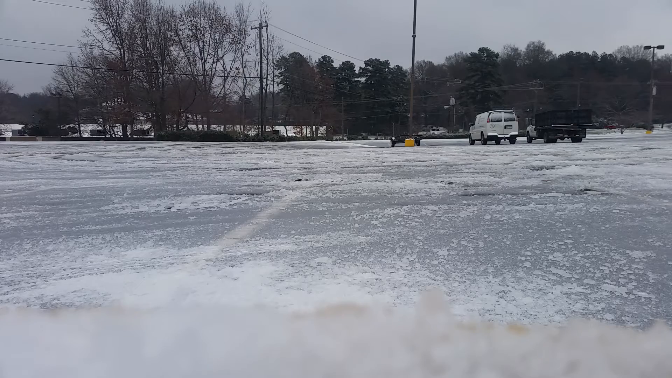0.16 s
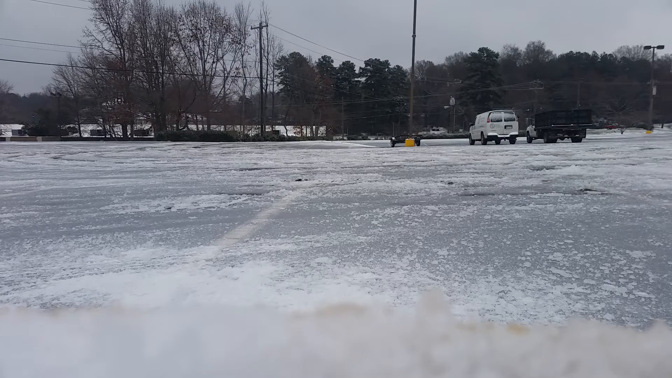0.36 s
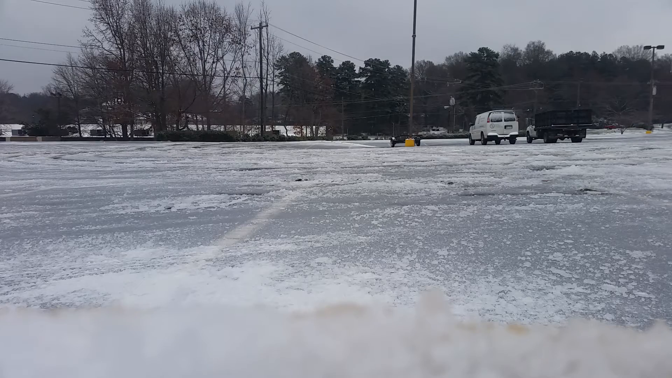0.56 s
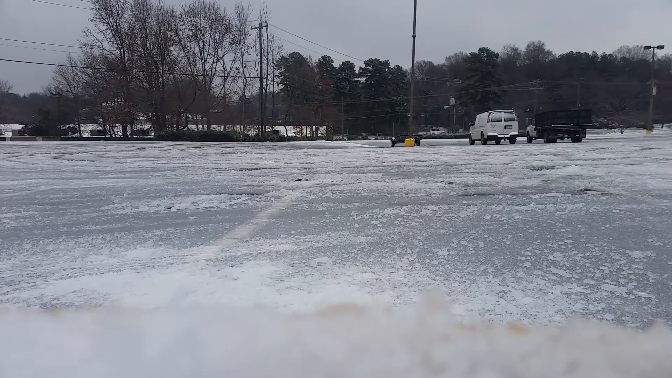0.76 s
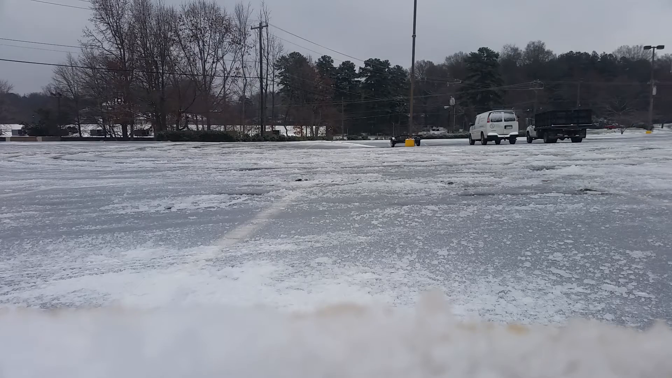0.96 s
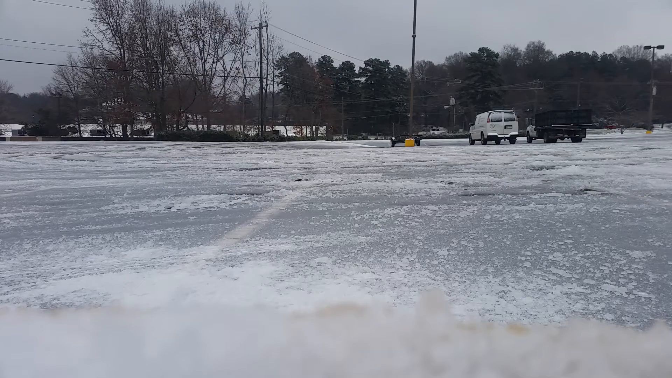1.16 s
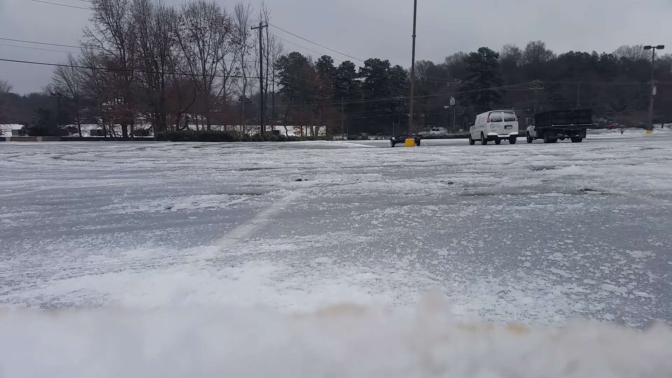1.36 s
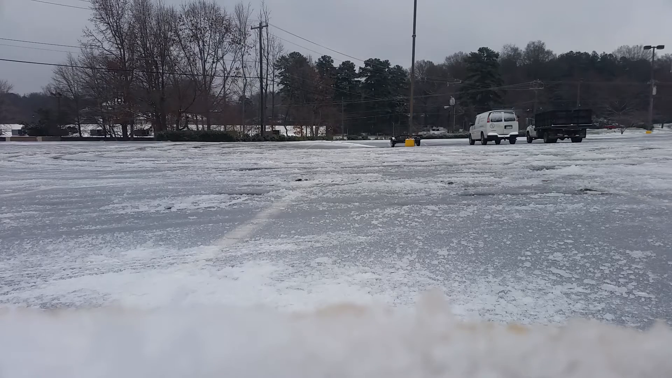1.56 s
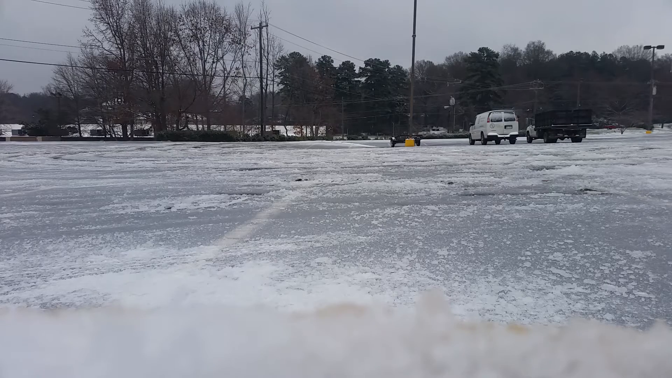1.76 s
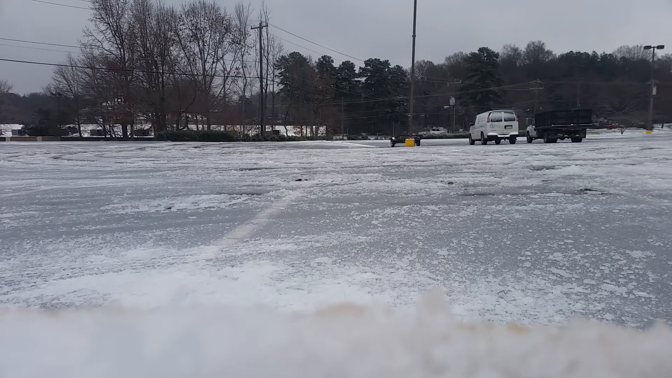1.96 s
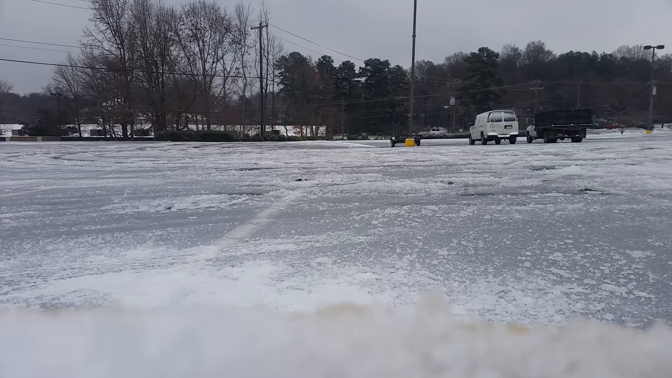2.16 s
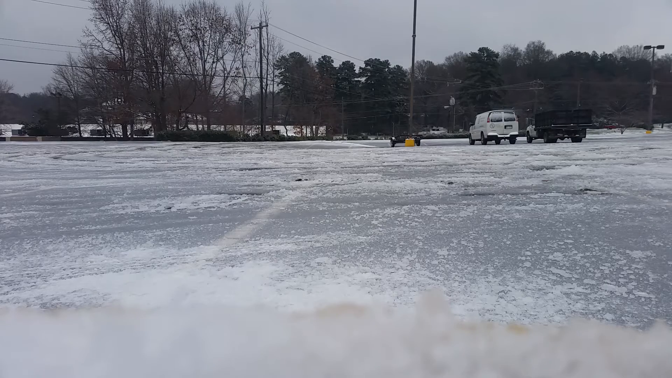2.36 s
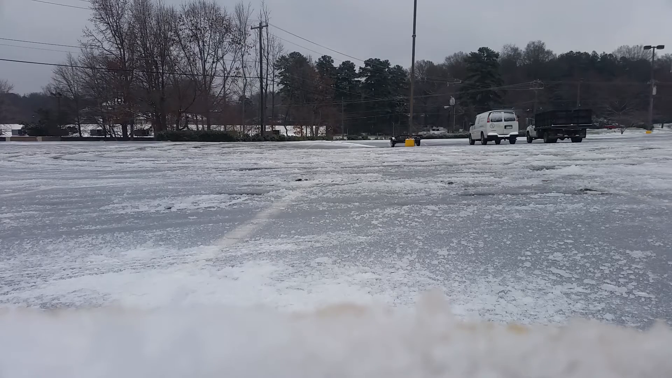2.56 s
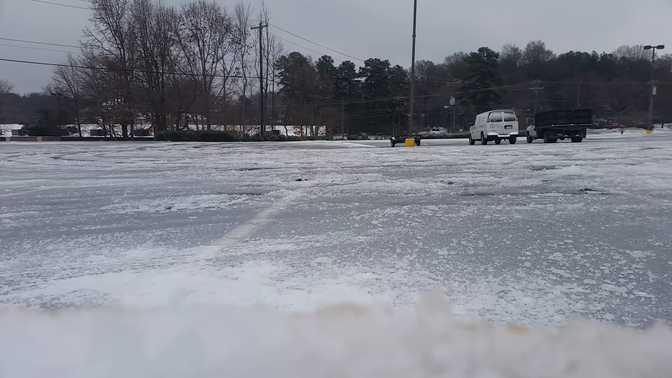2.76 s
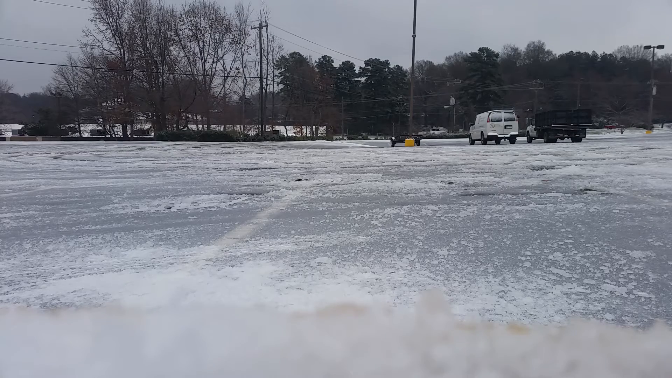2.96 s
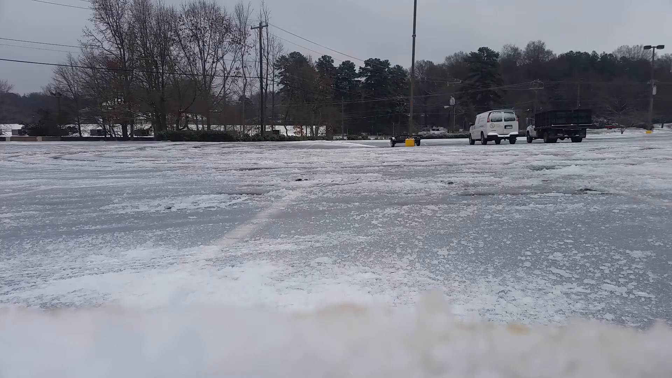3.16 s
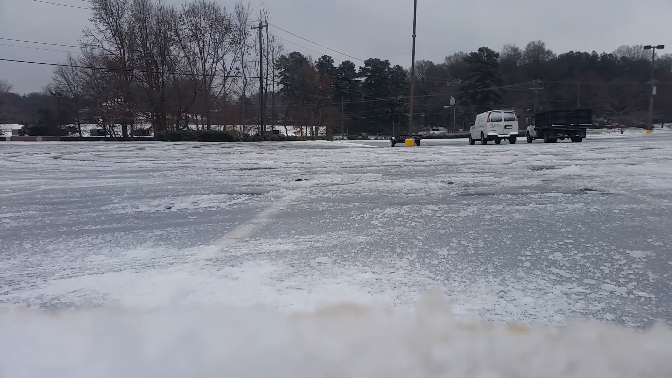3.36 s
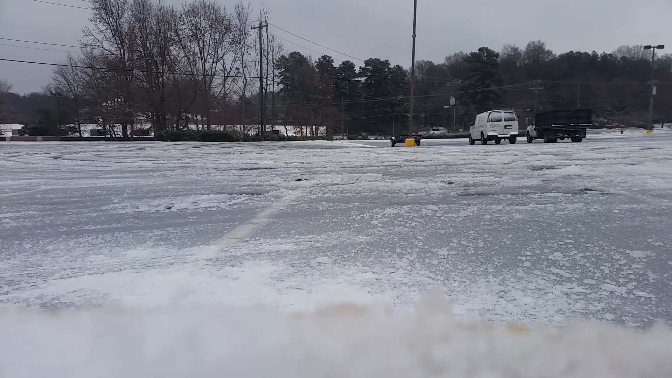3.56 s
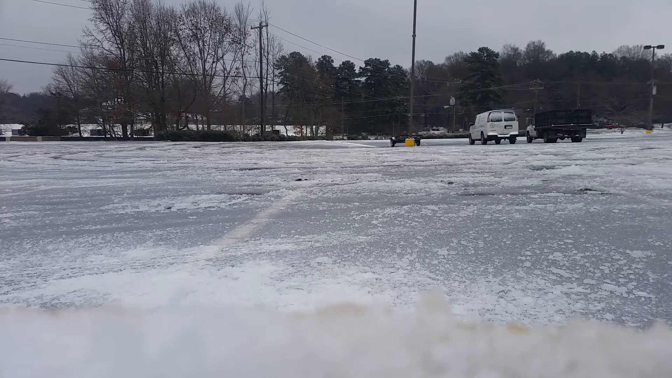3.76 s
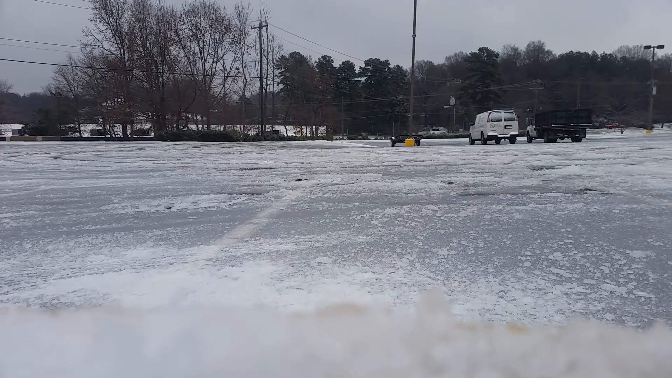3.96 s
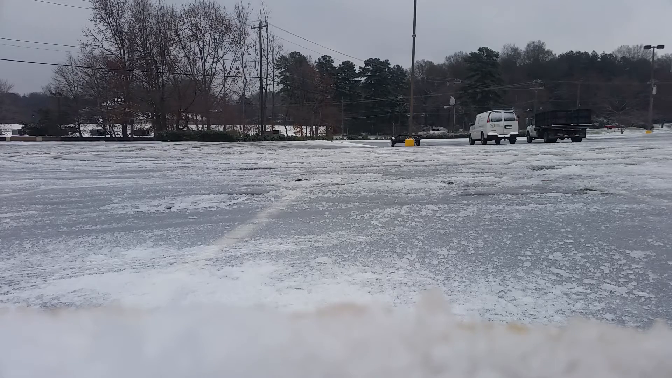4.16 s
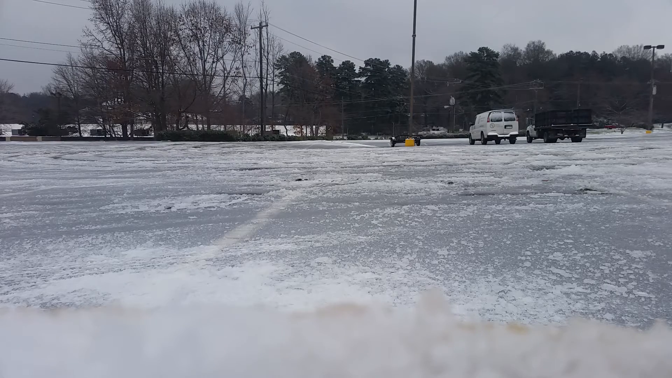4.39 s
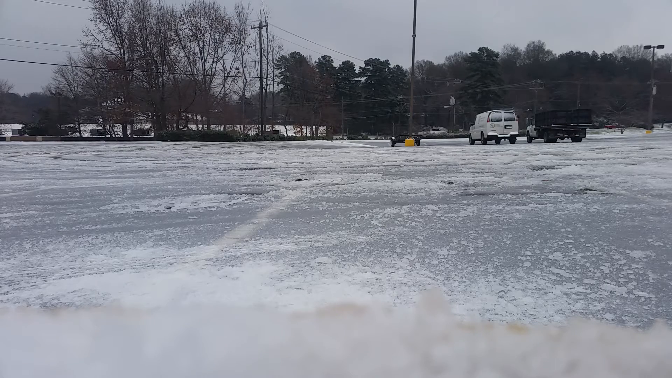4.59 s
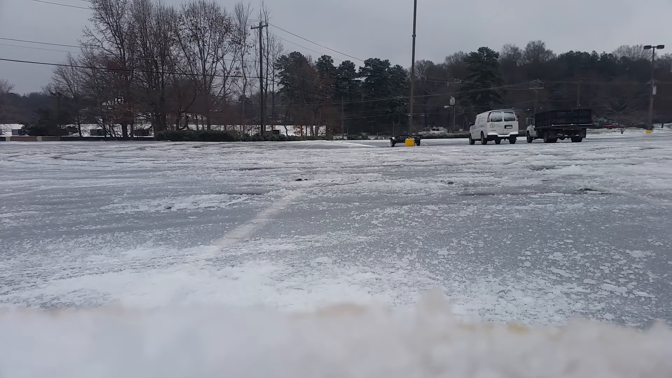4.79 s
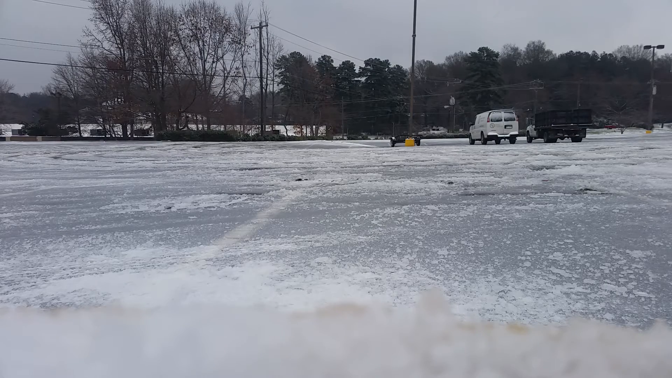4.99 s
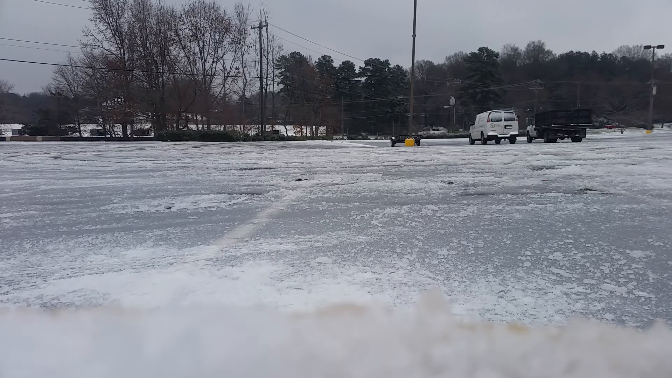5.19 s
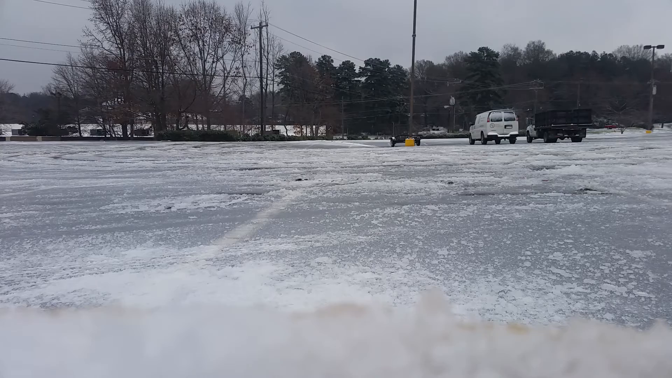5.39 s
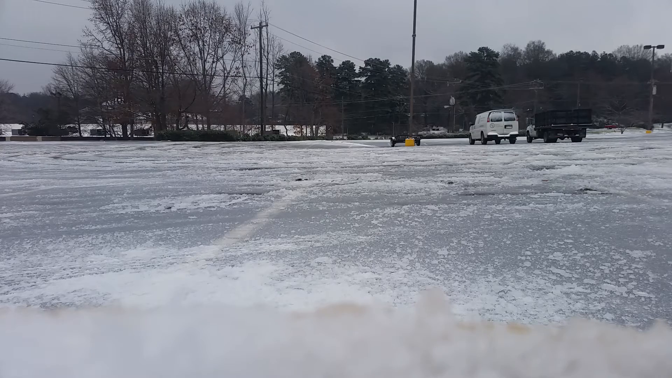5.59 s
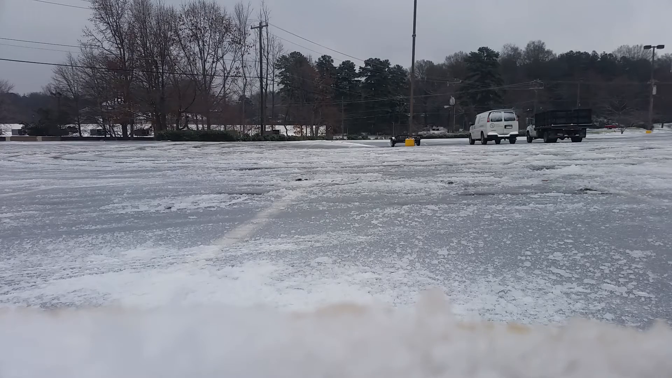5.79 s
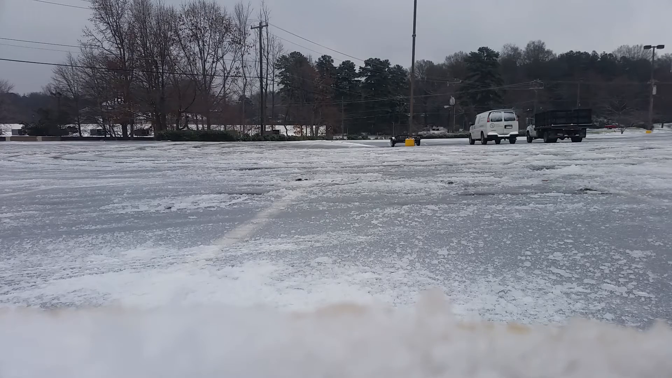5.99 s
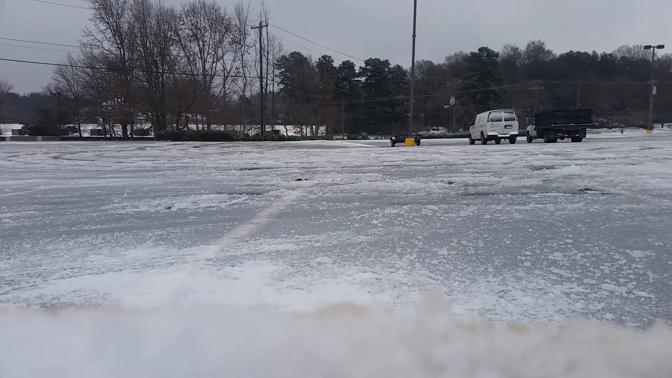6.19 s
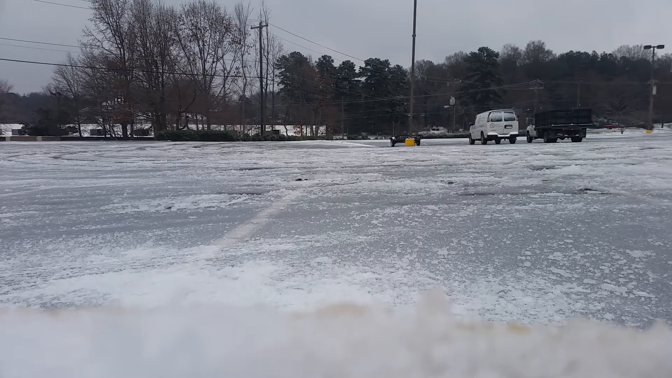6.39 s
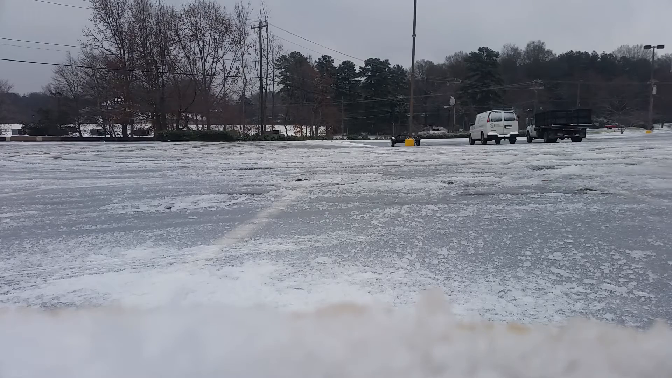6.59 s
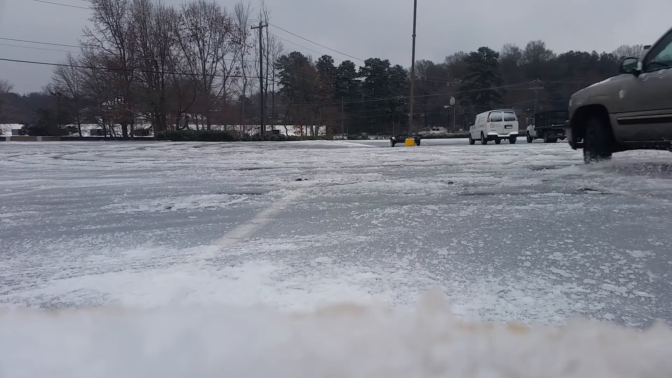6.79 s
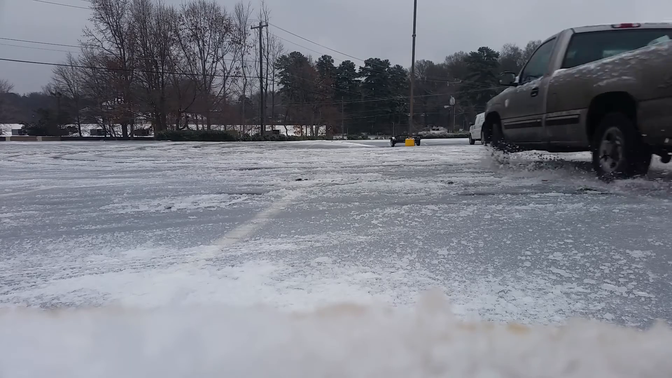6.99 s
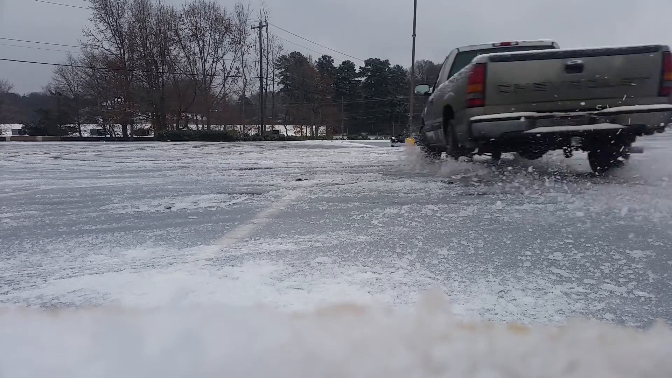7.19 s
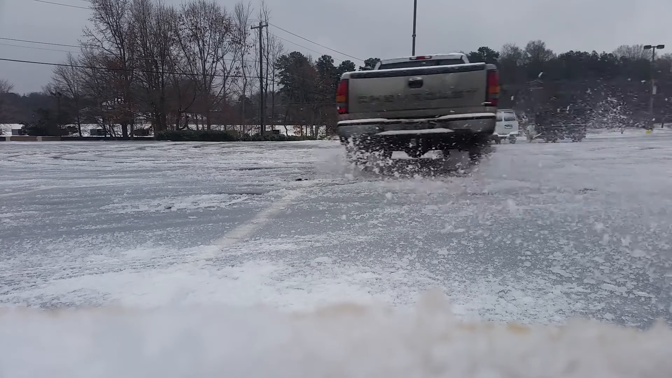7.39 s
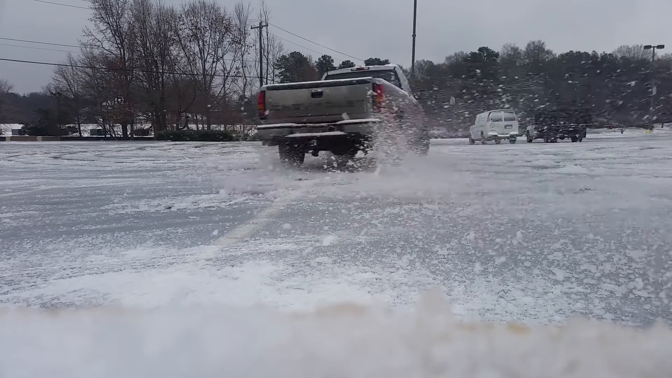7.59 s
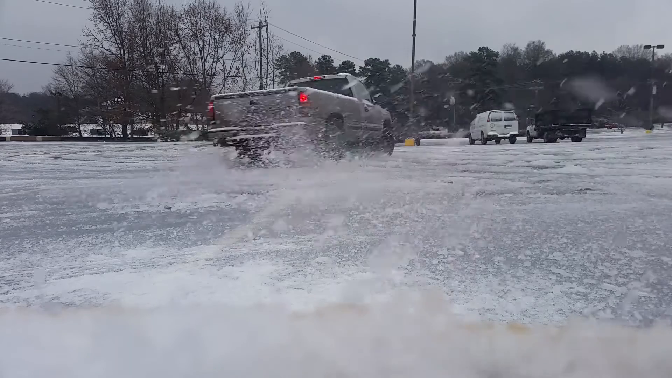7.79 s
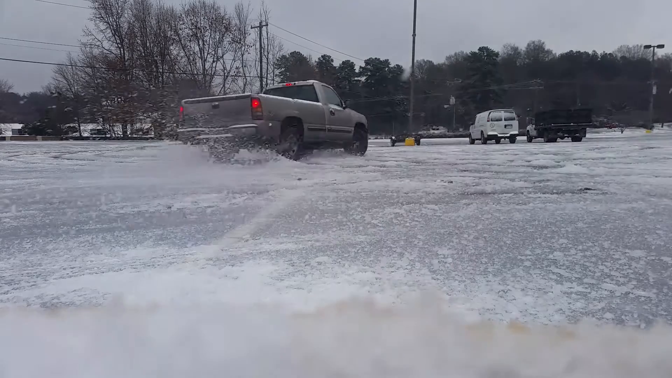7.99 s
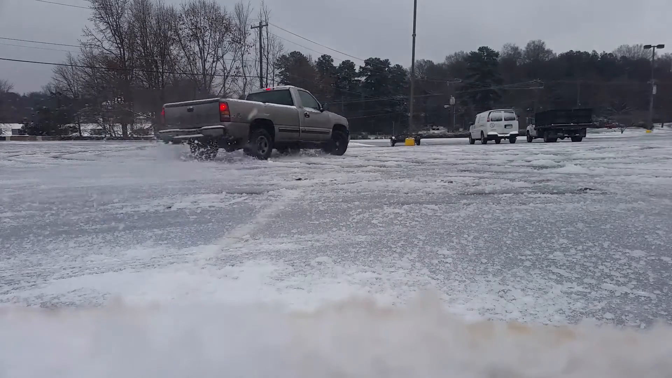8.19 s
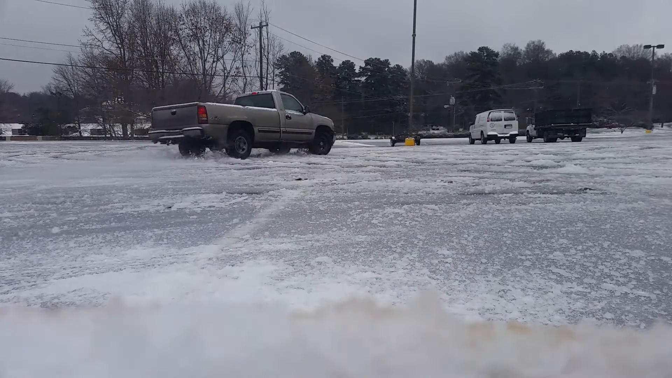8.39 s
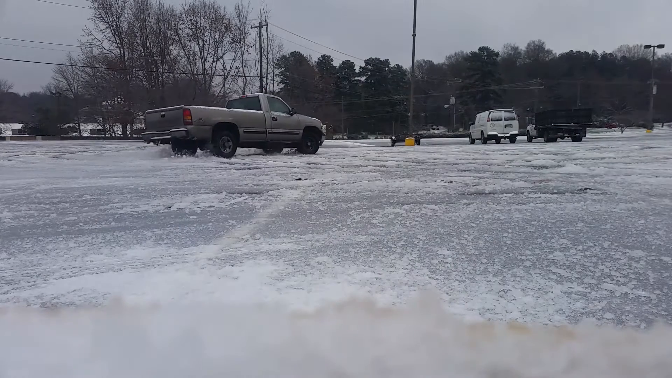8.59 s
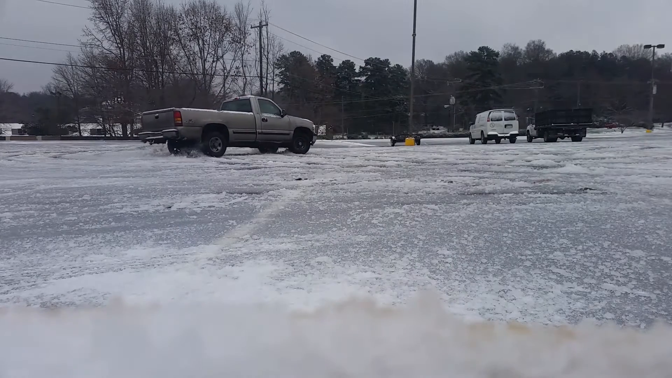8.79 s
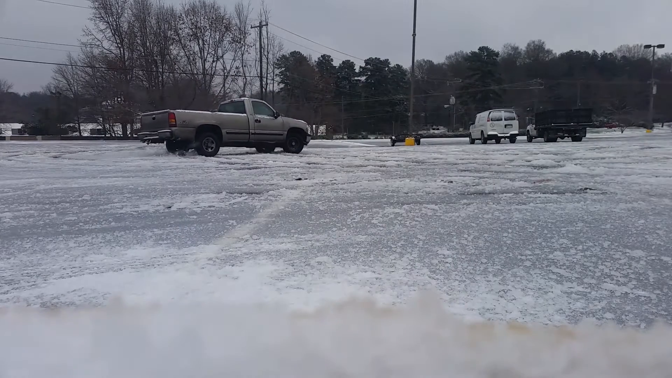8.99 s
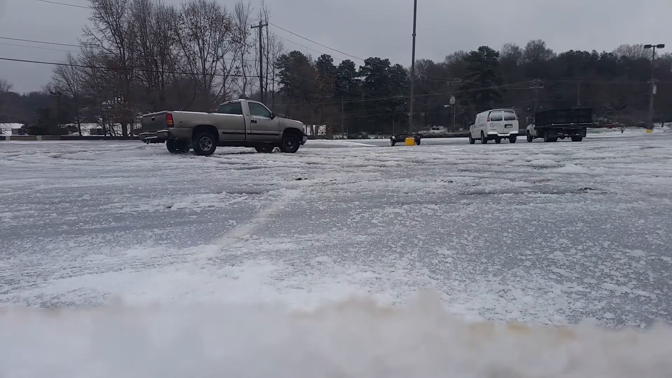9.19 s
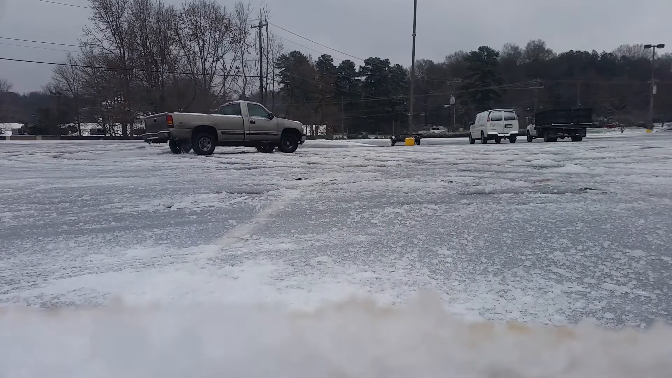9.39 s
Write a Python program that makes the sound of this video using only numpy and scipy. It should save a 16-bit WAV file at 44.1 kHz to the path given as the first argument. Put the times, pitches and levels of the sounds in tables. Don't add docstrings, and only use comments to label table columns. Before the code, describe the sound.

Outdoors on an icy open lot, a low stereo microphone hears a pickup circling off to the right, engine droning in short pushes over crunching crust. It charges closer, revs climbing, slides past with cracking ice and hissing spray. Ice bits tick and thud against the microphone body, the truck fades quickly, and a hard wind gust buffets at the end.

```python
import sys
import numpy as np
from scipy import signal
from scipy.fft import rfft, irfft, next_fast_len
from scipy.io import wavfile
from scipy.ndimage import map_coordinates

SR = 44100
rng = np.random.default_rng(int(sys.argv[2]) if len(sys.argv) > 2 else 0)


def master(y):
    cut = np.clip(np.atleast_2d(y).T, -1, 1)
    pcm = np.round(cut * 32767)
    wavfile.write(sys.argv[1], SR, pcm.astype(np.int16))


def voltage_ratio(decibels):
    exponent = np.asarray(decibels, float) / 20
    return 10 ** exponent


N = 416744

# t/s, rolling level/dB, wheelspin level/dB
PROGRESS = [(0, -31, -59), (1.14, -28.5, -55), (1.91, -32, -54.5), (2.3, -31.5, -51.5), (2.42, -37, -54),
            (3.2, -35.5, -57.5), (3.87, -35.5, -57), (4.5, -32.5, -54), (5.08, -28, -50.5),
            (5.48, -23.5, -44), (6.07, -20.5, -36.5), (6.99, -21.5, -33), (7.16, -20, -35.5),
            (7.9, -25.5, -41.5), (7.97, -37, -49.5), (8.25, -39, -56.5), (8.63, -42.5, -64.5),
            (9.45, -44, -63.5)]


def unit(x):
    return x / np.sqrt(np.mean(np.abs(x) ** 2) + 1e-20)


def along(points, hz):
    f, v = np.transpose(points)
    return np.interp(np.log(hz + 1), np.log(f + 1), v)


def curves(rows, t=None):
    s, *cols = np.transpose(rows)
    moments = np.arange(N) / SR if t is None else t
    return [np.interp(moments, s, c) for c in cols]


def wobble(rate):
    knots = rng.standard_normal(int(N * rate / SR) + 4)
    return map_coordinates(knots, [np.arange(N) * rate / SR])


def swell(s, db, length):
    return db * np.exp(-((np.arange(N) / SR - s) / length) ** 2)


def filtered(x, response):
    m = next_fast_len(N + SR // 2)
    return irfft(rfft(x, m) * response(np.fft.rfftfreq(m, 1 / SR)), m)[..., :N]


def resonance(f, hz, width_hz):
    return 1j * f * width_hz / (hz * hz - f * f + 1j * f * width_hz + 1e-9)


def upper(f, hz):
    return 1 / (1 + (hz / (f + 1)) ** 8)


def coloured(points, share):
    noise = rng.standard_normal((2, N))
    return unit(filtered(noise, lambda f: voltage_ratio(along(points, f)) * share(f)))


def crust(clumps_db):
    # f/Hz, density/dB per Hz
    crush = [(24, -49.5), (40, -13), (81, -5.5), (193, -2.5), (242, -4.5), (297, -6.5), (433, -5.5),
             (653, -5.5), (859, -6.5), (1510, -10.5), (2400, -27.5), (3120, -37.5), (5280, -120)]
    # t/s, swell/dB, length/s
    ruts = [(0.152, -6.5, 0.021), (0.216, 6.5, 0.053), (0.504, -4, 0.021), (0.8, -2.5, 0.0097),
            (1.413, -2.5, 0.013), (1.72, -2, 0.011), (7.23, -0.5, 0.09), (1.18, 1, 0.14),
            (3.37, 2.5, 0.073), (3.63, 2, 0.074), (4.078, 3, 0.11), (4.42, 4.5, 0.052), (6.635, 1, 0.098),
            (7.662, 1.5, 0.045), (7.826, 5, 0.015), (7.857, -8, 0.028), (7.894, 5.5, 0.014),
            (8.058, 6, 0.078)]
    # t/s, swell/dB, length/s
    squeaks = [
        (13, 4.5, 0.0092),
        (7.51, 7, 0.012),
        (7.62, 3, 0.037),
    ]
    edge_under_crush_db, muffled_db, turned_s = -3, -12, 1.46
    rolling_db, _ = curves(PROGRESS)
    crush_db = rolling_db + sum(swell(*rut) for rut in ruts)
    edge_db = crush_db + sum(swell(*squeak) for squeak in squeaks) + edge_under_crush_db
    edge_db = edge_db + muffled_db * np.clip(1 - np.arange(N) / SR / turned_s, 0, 1)
    body = voltage_ratio(crush_db + 3.5) * coloured(crush, lambda f: 1 - upper(f, 1164))
    edge = voltage_ratio(edge_db + 3.0 + 0.61 * wobble(16)) * coloured(crush, lambda f: upper(f, 825))
    return voltage_ratio(clumps_db + 1.0 * wobble(250)) * (body + edge)


def spray(clumps_db):
    # f/Hz, density/dB per Hz
    near_spray = [(1120, -20.5), (1900, -8.5), (2620, -3.5), (3210, -2), (4380, -7.5), (5420, -18.5),
                  (7000, -16.5), (8000, -24.5), (8840, -31.5), (10000, -36.5), (12300, -28), (15100, -23),
                  (15900, -29.5)]
    # f/Hz, density/dB per Hz
    far_spray = [(1120, -18.5), (1900, -8), (2310, -10), (2990, -11.5), (3420, -11.5), (4460, -13),
                 (5570, -22), (6830, -56.5), (8310, -60), (10500, -52), (12800, -33.5), (15100, -26.5),
                 (15900, -27)]
    # t/s, share of near spray (0-1), fine mist under the spray/dB
    nearness = [(0, 0.24, -13.5), (2.4, 0.18, -21.5), (4.3, 0.11, -12), (5, 0.24, -7.5), (5.5, 0.47, -12),
                (7.9, 0.95, -6), (8.3, 0.07, -1), (9.45, 0.089, -3)]
    # t/s, swell/dB, length/s
    spray_swells = [
        (5.3, 0, 0.11),
        (6.546, 4.5, 0.0076),
        (6.65, -2, 0.15),
        (6.946, 1.5, 0.1),
        (7.152, 1.5, .06),
    ]
    # t/s, level/dB
    drift = [
        (8.85, 0.5),
        (9.1, 9.5),
        (9.21, 11.5),
        (9.24, -2),
        (9.33, -0.5),
    ]
    drift_coarse = 0.6
    air_db = -75.5
    _, spin_db = curves(PROGRESS)
    near, mist_db = curves(nearness)
    near = np.clip(near, 0, 1)
    drift_db = curves(drift)[0]
    coarse_db = spin_db + sum(swell(*spray_swell) for spray_swell in spray_swells) + drift_coarse * drift_db
    fine_db = 10 * np.log10(voltage_ratio(spin_db + mist_db + drift_db) ** 2 + voltage_ratio(air_db) ** 2)

    def at_distance(share):
        return np.sqrt(near) * coloured(near_spray, share) + np.sqrt(1 - near) * coloured(far_spray, share)

    coarse = voltage_ratio(coarse_db + 6.5) * at_distance(lambda f: 1 - upper(f, 8400))
    fine = voltage_ratio(fine_db + 4.5 + 0.89 * wobble(18)) * at_distance(lambda f: upper(f, 10200))
    return voltage_ratio(0.35 * clumps_db + 0.84 * wobble(14) + 1.0 * wobble(550)) * (coarse + fine)


def tyres():
    clumps_db = 0.65 * wobble(12) + 1.07 * wobble(45)
    return crust(clumps_db) + spray(clumps_db)


def wind():
    # t/s, buffet level/dB, left-right/dB
    breeze = [(0, -25, -10), (.27, -27, 11), (.62, -31, 8), (1, -27.5, 9.5), (1.4, -34, 8),
              (1.78, -28, 14.5), (2.05, -30, 2), (2.6, -34, 5.5), (3.72, -39, 4), (4.26, -33.5, 8.5),
              (4.83, -35, 6), (5.87, -48, 12.5), (7.76, -28.5, -6.5), (8.1, -35, 10), (8.6, -53.5, 19),
              (8.88, -39, 1), (8.95, -23.5, -9.5), (9.28, -21, -3)]
    # t/s, peak level/dB, length/s
    gust = [
        [(8.955, -10, 0.013), (8.985, -7, 0.01), (9.005, -20, 0.0072), (9.085, -4.5, 0.018),
         (9.105, -10, 0.015), (9.15, -7, 0.0092), (9.175, -6, 0.027), (9.192, 4, 0.0047), (9.215, -9, 0.0065),
         (9.23, -13, 0.018)],
        [(8.952, -9, 0.0084), (8.968, -9, 0.0081), (9.01, -11, 0.017), (9.05, -7.5, 0.0071),
         (9.15, -9.5, 0.018), (9.24, 2.5, 0.0078), (9.262, -3.5, 0.0058), (9.272, -5, .006), (9.298, -12, .006),
         (9.287, -3, 0.0064), (9.32, -29, 0.028)],
    ]
    # f/Hz, density/dB per Hz
    buffet = [(12, -43.5), (20, -14), (64, -2), (108, -1.5), (256, -13.5), (381, -19.5), (447, -22.5),
              (900, -33.5), (1170, -55), (1980, -120)]
    lull_db_per_s = -80
    snap_10ms_db, snap_db_per_doubling = -22.5, -5
    t = np.arange(N) / SR
    level_db, pan_db = curves(breeze)
    level_db = level_db + lull_db_per_s * np.clip(t - breeze[-1][0], 0, None)
    slow_lumps, quick_lumps = np.array([wobble(16), wobble(18)]), np.array([wobble(55), wobble(55)])
    lumps = voltage_ratio(2.7 * slow_lumps + 1.8 * quick_lumps)
    noise = rng.standard_normal((2, 2, N))
    eddies = unit(filtered(noise[0], lambda f: voltage_ratio(along(buffet, f))))
    snaps = unit(filtered(noise[1], lambda f: resonance(f, 350, 350) ** 2))
    rumble = unit(lumps * filtered(eddies, lambda f: resonance(f, 85, 150)))
    out = voltage_ratio(level_db + 1.5 + np.outer([0.5, -0.5], pan_db)) * rumble
    for port, rows in enumerate(gust):
        for s, db, length in rows:
            snap_db = snap_10ms_db + snap_db_per_doubling * np.log2(100 * length)
            span = slice(round((s - 0.1) * SR), round((s + 0.1) * SR))
            push = eddies[port, span] * np.exp(-((t[span] - s) / length) ** 2)
            snap = snaps[port, span] * np.exp(-((t[span] - s) / (0.5 * length)) ** 2)
            out[port, span] += voltage_ratio(db) * (push / np.abs(push).max() + voltage_ratio(snap_db) * snap)
    return out


def cracks():
    # t/s, peak level/dB, slab f/Hz
    breaks = [(0.025, -21, 442), (0.183, -23.5, 473), (0.229, -25.5, 441), (0.385, -23.5, 574),
              (0.441, -30, 468), (0.652, -18.5, 584), (0.812, -22.5, 589), (0.853, -15.5, 463),
              (1.121, -20, 675), (1.359, -22, 476), (1.46, -23, 1550), (1.609, -14.5, 630),
              (1.685, -19.5, 584), (1.742, -21.5, 504), (1.866, -12.5, 530), (2.328, -27, 454),
              (2.824, -26, 1286), (2.869, -22.5, 1340), (3.26, -20.5, 424), (3.418, -21, 432),
              (3.554, -19.5, 559), (3.892, -30, 1446), (3.924, -21.5, 580), (4.041, -22, 525),
              (4.137, -20.5, 458), (4.658, -17.5, 690), (4.697, -23, 401), (4.786, -11, 629),
              (5.108, -19, 1463), (5.258, -15.5, 430), (5.364, -15, 1130), (5.707, -10, 427),
              (6.097, -9, 568), (6.485, -11.5, 530), (6.592, -9, 488), (7.045, -16, 493), (7.524, -8, 595)]
    crack_t60_s, crack_db = 0.035, -1.5
    slab_t60_s, slab_db = 0.089, -2
    out, t = np.zeros(N + SR), np.arange(SR // 10) / SR
    dull = signal.butter(5, [330, 1750], "band", fs=SR, output="sos")
    for s, db, slab_hz in breaks:
        burst = signal.sosfilt(dull, rng.standard_normal(len(t)) * voltage_ratio(-60 * t / crack_t60_s))
        wander = 0.07 * np.cumsum(rng.standard_normal(len(t)))
        tone = np.sin(2 * np.pi * slab_hz * t + wander)
        ring = signal.sosfilt(dull, voltage_ratio(slab_db - 60 * t / slab_t60_s) * tone)
        out[round(s * SR):][:len(t)] += voltage_ratio(db + crack_db) * (burst / np.abs(burst).max() + ring)
    return out[:N]


def drone(rows, overtones_db=0):
    # f/Hz, level/dB
    pipe = [(60, 0), (150, 0), (166, 3), (180, 10), (195, 14), (203, 8), (213, 0), (240, 3), (400, -5)]
    # f/Hz, level/dB
    second_mode = [(200, -1), (250, -4), (290, -12), (330, -5), (355, -2), (380, 1), (395, -3), (410, -11),
                   (440, -18), (500, -11)]
    # multiple of the firing rate, level/dB
    uneven = [(0.376, -5), (.5, -14.5), (.625, -4), (.75, -17), (.875, 1), (1.126, -6), (1.25, -2.5),
              (1.5, -8)]
    pipe_share = 0.8
    uneven_db = -11
    t = np.arange(N) / SR
    hz, throttle_db = curves(rows)
    tone_db = throttle_db + pipe_share * along(pipe, hz)
    octave_db = throttle_db + along(second_mode, 2 * hz) + overtones_db
    fade_in = np.clip((t - rows[0][0]) / 0.089, 0, 1)
    fade_out = np.clip((rows[-1][0] - t) / 0.34, 0, 1)
    turn = 2 * np.pi * np.cumsum(hz * (1 + 0.002 * wobble(20))) / SR
    x = voltage_ratio(tone_db + 0.3 + 1.1 * wobble(25)) * np.sin(turn)
    x = x + voltage_ratio(octave_db - 3.5 + 3.5 * wobble(12)) * np.sin(2 * turn)
    for order, db in uneven:
        drift = 0.45 * wobble(5)
        order_db = throttle_db + uneven_db + overtones_db + db + along(pipe, order * hz)
        x = x + voltage_ratio(order_db + 2.6 * wobble(7)) * np.sin(order * turn + drift)
    return np.sqrt(2) * fade_in * fade_out * x


def exhaust():
    # t/s, firing f/Hz, throttle level/dB
    circle = [
        (.2, 100, -35),
        (.45, 130, -29),
        (.7, 154, -33),
        (1.15, 173, -36),
        (1.3, 150, -35.5),
        (1.45, 140, -33),
        (1.9, 121, -43),
    ]
    # t/s, firing f/Hz, throttle level/dB
    creep = [
        (3.25, 86, -45),
        (3.5, 116, -33),
        (3.75, 101.5, -35),
        (4, 119, -30.5),
        (4.27, 117, -29.5),
        (4.47, 138, -28),
        (4.62, 157, -34),
    ]
    # t/s, firing f/Hz, throttle level/dB
    charge = [
        (4.751, 158, -33),
        (4.901, 171.5, -28),
        (5.23, 198, -27),
        (5.4, 213, -25),
        (5.67, 235.5, -23.5),
        (5.98, 253.5, -28),
        (6.2, 251, -23.5),
        (6.379, 245.5, -27),
        (6.53, 229.5, -24),
    ]
    # t/s, firing f/Hz, throttle level/dB
    slide = [
        (6.619, 203, -39),
        (6.72, 189.7, -49),
        (6.78, 183.5, -28.5),
        (7, 181.5, -31.5),
        (7.08, 184.9, -27),
        (7.42, 182.7, -24.5),
        (7.62, 176.5, -30),
        (7.75, 153.4, -24),
        (7.97, 147.2, -22),
    ]
    return drone(circle, overtones_db=-7) + drone(creep + charge + slide)


def knocks():
    # t/s, peak level/dB
    barrel_hits = [
        (7.82, -19.5),
        (7.836, -30),
        (8.002, -33),
        (8.19, -42),
    ]
    barrel_hz, barrel_t60_s = 3270, 0.01
    out, t = np.zeros(N), np.arange(SR // 50) / SR
    for s, db in barrel_hits:
        ring = voltage_ratio(db - 60 * t / barrel_t60_s) * np.sin(2 * np.pi * barrel_hz * t)
        out[round(s * SR):][:len(t)] += ring
    return out


def bits():
    # t/s, peak level/dB, left-right/dB, ring level/dB, thud level/dB
    hits = [(7.8202, -13, 1.5, -3, 17), (7.8484, -20.5, 5.5, -16, 15.5), (7.855, -29.5, -17, -17, 32.5),
            (7.861, -22, -3, -10, -13), (7.874, -33, 8, 8, 15), (7.8893, -22.5, 3, 4, 5),
            (7.8993, -26, -3, 2, 22.5), (7.9112, -24, 8.5, 1, -5), (7.9246, -18, 13, 4.5, -8),
            (7.833, -28.5, 2, -14, 0), (7.843, -28, -2.5, -16, 0), (7.9548, -42.5, -2.5, -15, 12),
            (7.956, -27.5, -8, -26, -3), (7.867, -27.5, -8, -5, 5), (7.884, -25.5, -1.5, 4, 3),
            (7.935, -28, -10, -17, 0), (7.959, -24.5, -14.5, -18.5, -2), (7.972, -32, -12, -19, 0),
            (7.983, -33, -11, -15.5, 15), (7.9648, -33, 7, -18, 11), (7.9962, -19, 16.5, -19, -9),
            (8.0027, -35.5, 6, 4, 19), (8.007, -40, 5, 10.5, 0), (8.189, -47.5, 11, -4, 19)]
    # f/Hz, width/Hz
    shell = [
        (200, 160),
        (4450, 1100),
        (14500, 8000),
    ]
    ring_left_db = 16
    thuds, rings, ticks = np.zeros((3, 2, N))
    for s, db, pan_db, ring_db, thud_db in hits:
        start = round(s * SR)
        side = voltage_ratio(db + np.array([pan_db, -pan_db]) / 2)
        grit = rng.standard_normal(60) * voltage_ratio(-np.arange(60) * 1.4)
        scrape = np.outer(side, grit / np.linalg.norm(grit))
        ticks[:, start:][:, :60] += voltage_ratio(12.5) * scrape
        rings[:, start] += voltage_ratio(ring_db + 17.0 + np.array([0.5, -0.5]) * ring_left_db) * side
        thuds[:, start] += voltage_ratio(db + thud_db + 28) * rng.uniform(0.6, 1.2, size=2)
    return sum(filtered(x, lambda f: resonance(f, *mode) ** 2) for x, mode in zip((thuds, rings, ticks), shell))


def left_phase(hz, ahead, t):
    # f/Hz, turn/rad
    twist = [(300, .1), (600, .6), (860, -1.2), (1250, -.6), (1900, 0)]
    # f/Hz, left
    lag_ahead = [(300, 0), (1030, -.12), (1400, -.1), (1500, -.14), (1560, .84), (1720, .81), (2070, .58),
                 (2580, .36), (2640, 1.3), (3100, 1.5), (3450, 1.7), (4800, 2.15), (16000, 7.6)]
    # t/s, lead/ms
    passing = [
        (6.55, 0),
        (6.8, .015),
        (7.05, .065),
        (7.15, 0),
    ]
    lag_side_ms = 0.48
    swing, slow_hz = 2.1, 1020
    slow = np.exp(-((hz - slow_hz) / 300) ** 2)
    swung = slow * ahead ** 1.5 + (1 - slow) * np.clip(swing * ahead, 0, 1)
    cycles = np.interp(hz, *np.transpose(lag_ahead))
    side_phase = along(twist, hz) - 2 * np.pi * hz * lag_side_ms / 1000
    phase = (1 - swung) * side_phase - swung * 2 * np.pi * cycles
    treble = 1 / (1 + (2000 / (hz + 1)) ** 6)
    return phase + 2 * np.pi * hz * curves(passing, t)[0] / 1000 * treble


def shading(hz, ahead, t):
    # f/Hz, left-right/dB
    shade_side = [(60, 5.5), (92, -1), (140, -5.5), (210, 1), (330, -3.5), (500, 1), (770, 6),
                  (1170, -11.5), (1790, -5.5), (2740, -2.5), (4190, 6.5), (6410, -1.5), (9810, 3.5),
                  (15000, -2)]
    # f/Hz, left-right/dB
    shade_ahead = [(60, -5), (92, 4), (140, -1.5), (210, 2.5), (330, 0.5), (500, 1), (770, -1), (1170, 2),
                   (1790, -5.5), (2300, 0), (3250, 2.5), (4190, 21.5), (6410, 0.5), (9810, 25), (15000, 11)]
    # t/s, shade level/dB, arch left level/dB, arch right level/dB
    facing = [(0, -4.5, 1, -0.5), (1.5, 2, 2, 1), (3, -1, -6.5, -5), (4.4, 3, -1, -1.5), (5.2, 7, -1, 0.5),
              (6.75, 5, 6, 1), (6.95, -2, 4, -2.5), (7.25, -1.5, 1, -9.5), (7.45, 0, 10.5, -2),
              (7.85, 0.5, 8, 4.5), (8.2, -1, -0.5, -2.5), (8.7, -1.5, 3, 4), (9.45, -2.5, -5, -1)]
    arch_hz = [2420, 2200]
    arch_width_hz, shade_hz = 750, 2860
    side_db, ahead_db = along(shade_side, hz), along(shade_ahead, hz)
    shade_db, *arch_db = curves(facing, t)
    half = voltage_ratio((side_db + (ahead_db - side_db) * ahead) / 2)
    half = half * voltage_ratio(-shade_db / 2 / (1 + (shade_hz / (hz + 1)) ** 4))
    arch = [voltage_ratio(db * np.abs(resonance(hz, centre_hz, arch_width_hz)) ** 2)
            for db, centre_hz in zip(arch_db, arch_hz)]
    return half * arch[0], arch[1] / half


def ports(direct, scattered):
    # t/s, bearing (0 right side - 1 ahead), width of the near truck (0-1)
    bearing = [(0, 0, 0), (6, 0, .05), (6.5, .05, .2), (6.85, .1, .2), (6.98, .19, .15), (7.06, .27, .75),
               (7.2, .45, .8), (7.4, .64, .75), (7.7, .92, .8), (8, 1, .8), (9.45, 1, .7)]
    # f/Hz, share that is direct (0-1)
    alike_share = [(100, .98), (1500, .97), (3000, .86), (6000, .7), (12000, .45)]
    # t/s, f/Hz, depth (0-1)
    ground = [(0, 2010, 0.73), (1.2, 2160, 0.92), (2.5, 2560, 0.67), (4.2, 2360, 0.63), (5, 3290, 0.25),
              (5.5, 3320, 0), (6.3, 1580, 0.13), (6.7, 1403, 0.27), (7, 1600, 0.6), (7.25, 1600, 0.26),
              (7.36, 1694, 0.04), (7.42, 3400, 0.34), (7.6, 3340, 0.4), (8.4, 3250, 0.53)]
    # t/s, f/Hz, depth (0-1)
    bank_left = [(0, 950, 0), (4.5, 950, 0), (6, 930, 0.18), (6.5, 1450, 0.05), (6.9, 1370, 0.77),
                 (7.4, 1130, 1), (7.85, 1070, 1), (8.3, 1162, 1), (9.45, 1130, 0.7)]
    # t/s, f/Hz, depth (0-1), depth near its double (0-1)
    bank_right = [(0, 702, .65, 0.81), (1.5, 720, 0.62, 0.64), (2.6, 705, 0.55, .05),
                  (3.8, 725, 0.52, 0.18), (5, 735, 0.42, 0.12), (6.4, 700, 0.82, 0.68),
                  (6.9, 740, 0.67, 0.3), (7.3, 864, 1, 0.012), (7.7, 1019, 1, 0), (9.45, 1150, 1, 0)]
    # t/s, depth (0-1)
    cavity = [(0, 0.64), (4.5, 0.48), (5.4, 0.66), (6.9, 0.5), (7.5, 1), (8.4, .93)]
    cavity_hz, cavity_width_hz = 3840, 1300
    ground_width, double = 0.66, 1.68
    frame = 512
    hz, t, z = signal.stft([direct, scattered], SR, nperseg=frame)
    hz = hz[:, None]
    ahead, width = curves(bearing, t)

    def dip(depth, centre_hz, width_hz):
        return np.abs(1 - depth * resonance(hz, centre_hz, width_hz))

    mirror_hz, depth = curves(ground, t)
    z = z * dip(np.clip(depth, 0, 0.9), mirror_hz, ground_width * mirror_hz)
    alike = along(alike_share, hz) * (1 - np.clip(width, 0, 1) * hz ** 2 / (hz ** 2 + 2800 ** 2))
    same = np.sqrt((1 + alike) / 2) * z[0]
    other = np.sqrt((1 - alike) / 2) * z[1]
    left_gain, right_gain = shading(hz, ahead, t)
    left_hz, left_depth = curves(bank_left, t)
    right_hz, right_depth, double_depth = curves(bank_right, t)
    left = left_gain * np.exp(1j * left_phase(hz, ahead, t)) * (same + other)
    left = left * dip(np.clip(left_depth, 0, 0.95), left_hz, 430)
    left = left * dip(np.clip(curves(cavity, t)[0], 0, 0.97), cavity_hz, cavity_width_hz)
    right = right_gain * (same - other) * dip(np.clip(right_depth, 0, 0.95), right_hz, 260)
    right = right * dip(np.clip(double_depth, 0, 0.9), double * right_hz, 300)
    return signal.istft(np.array([left, right]), SR, nperseg=frame)[1][:, :N]


def scene():
    direct, scattered = tyres()
    truck = ports(direct + cracks() + exhaust(), scattered)
    return truck + wind() + knocks() + bits()


def top_cut(x):
    return signal.sosfilt(signal.butter(12, 17100, fs=SR, output="sos"), x)


def record(dry):
    clip_smooth_hz = 4200
    excess = dry / (1 + np.abs(dry / 0.93) ** 6) ** (1 / 6) - dry
    clipped = dry + filtered(excess, lambda f: 1 / (1 + (f / clip_smooth_hz) ** 4))
    limited = filtered(clipped, lambda f: f < 15850)
    return top_cut(limited)


dry = scene()
out = record(dry)
master(out)
```